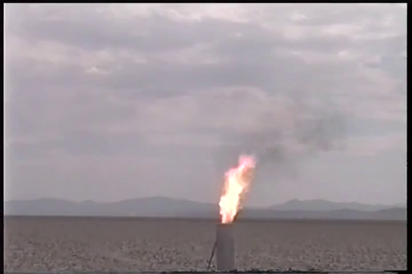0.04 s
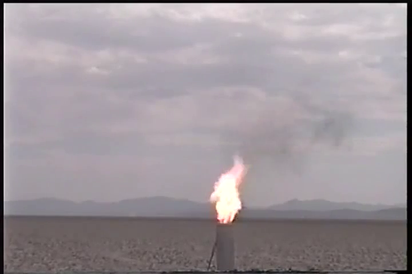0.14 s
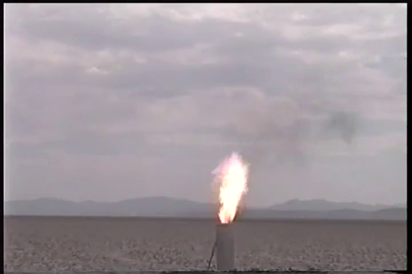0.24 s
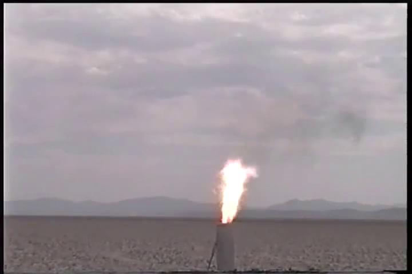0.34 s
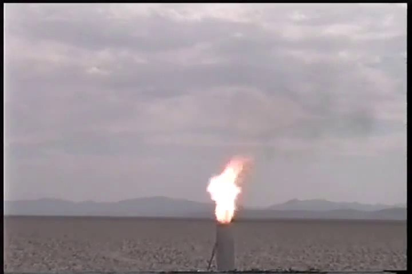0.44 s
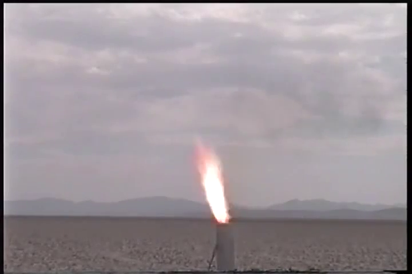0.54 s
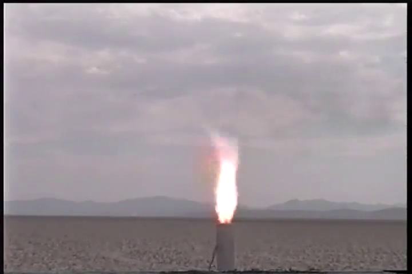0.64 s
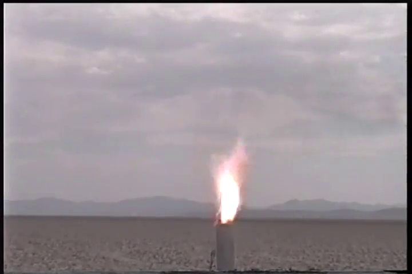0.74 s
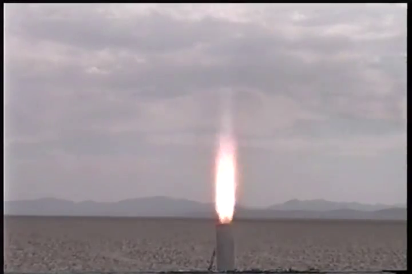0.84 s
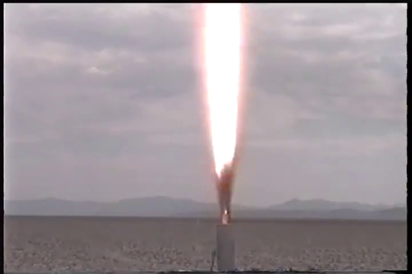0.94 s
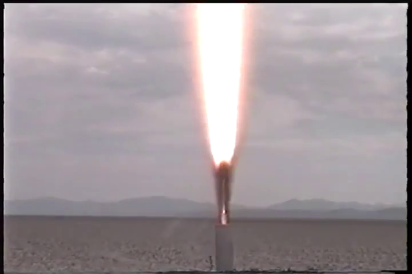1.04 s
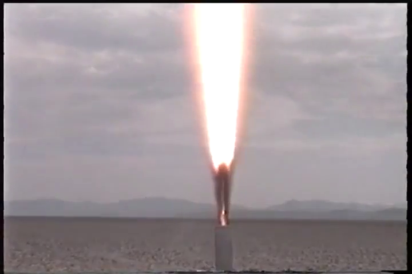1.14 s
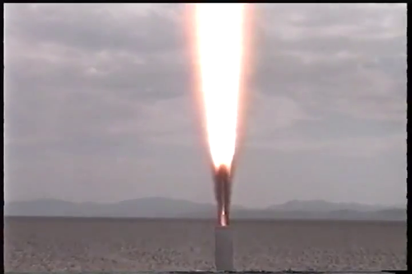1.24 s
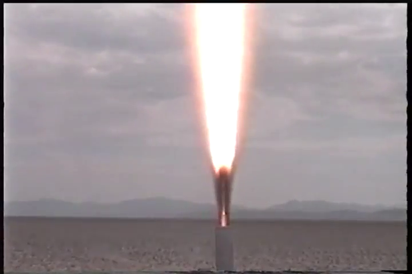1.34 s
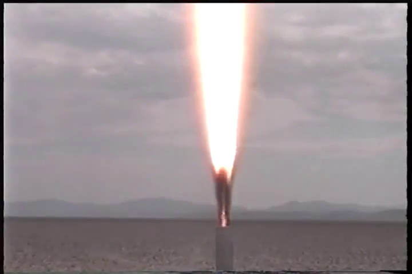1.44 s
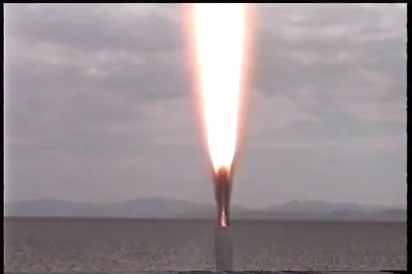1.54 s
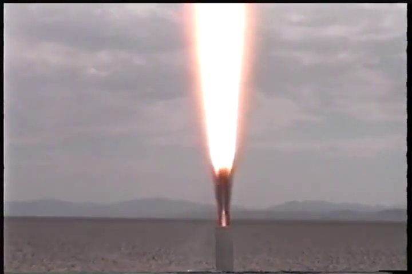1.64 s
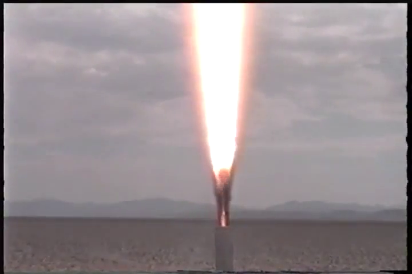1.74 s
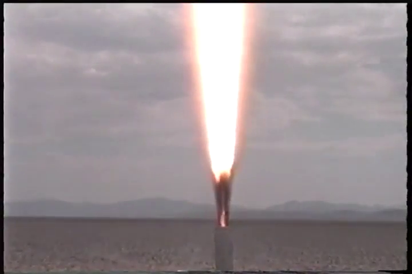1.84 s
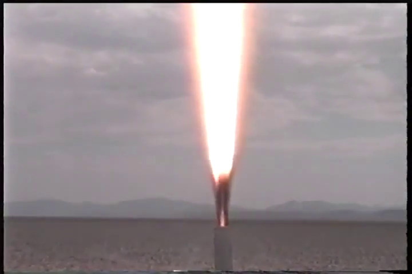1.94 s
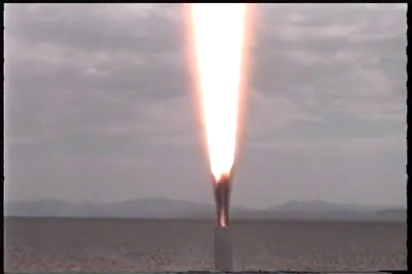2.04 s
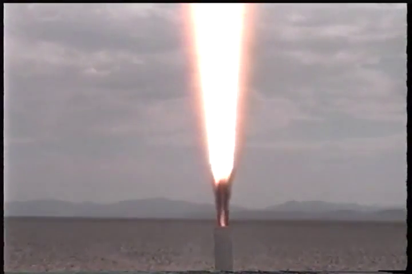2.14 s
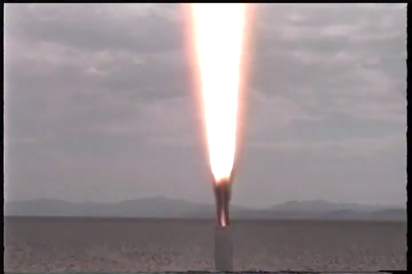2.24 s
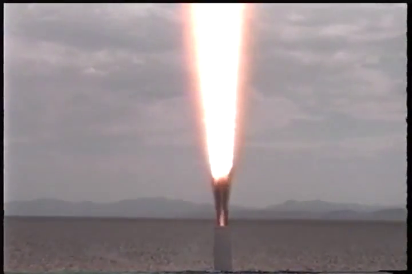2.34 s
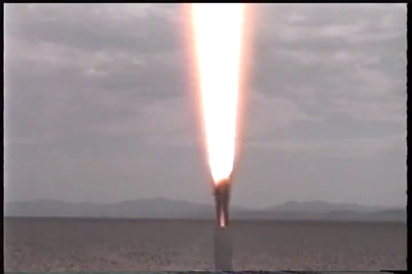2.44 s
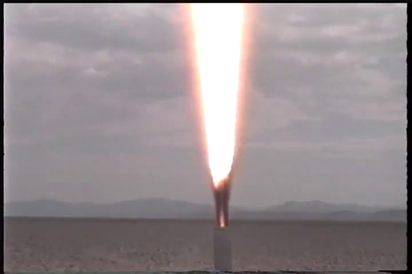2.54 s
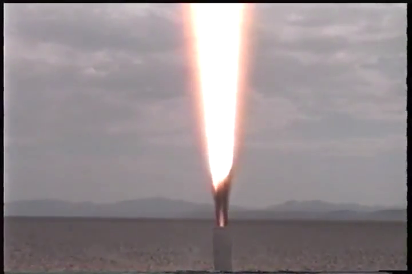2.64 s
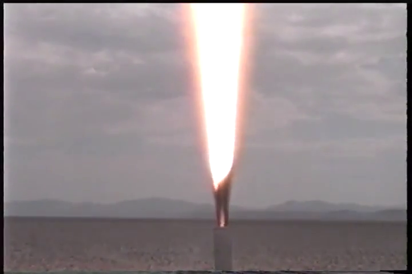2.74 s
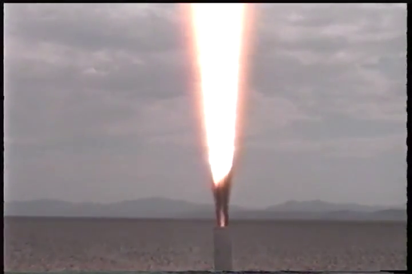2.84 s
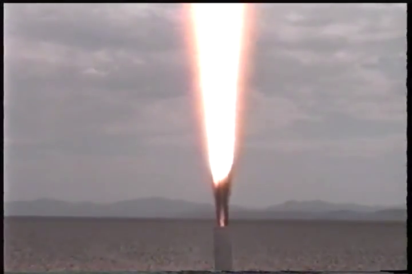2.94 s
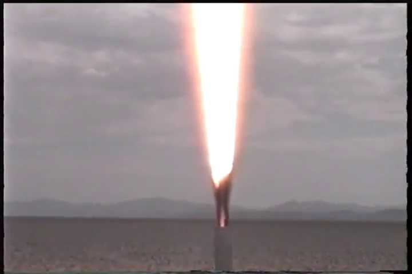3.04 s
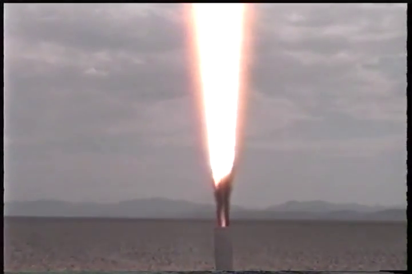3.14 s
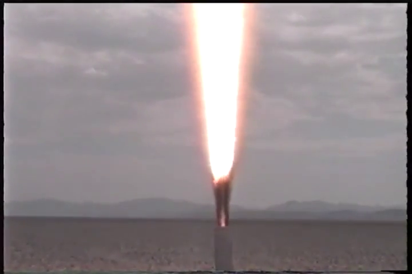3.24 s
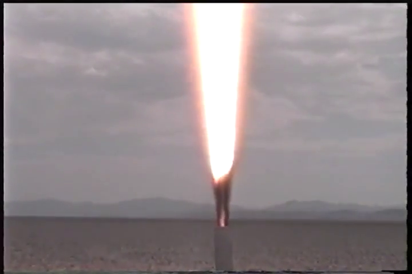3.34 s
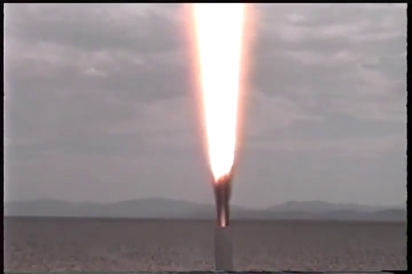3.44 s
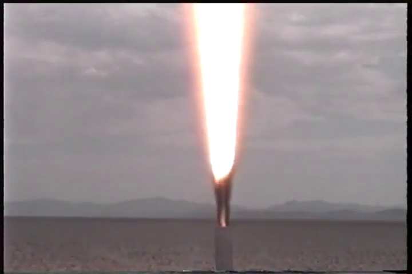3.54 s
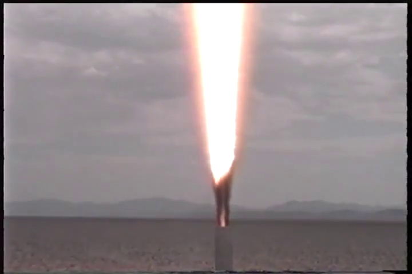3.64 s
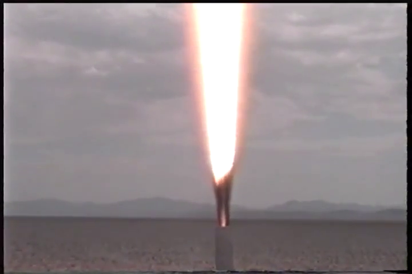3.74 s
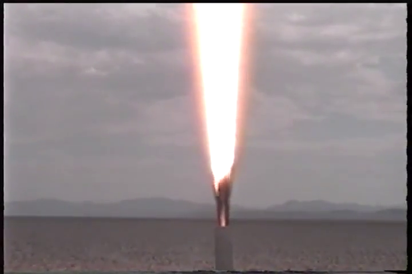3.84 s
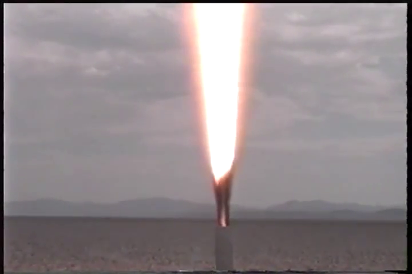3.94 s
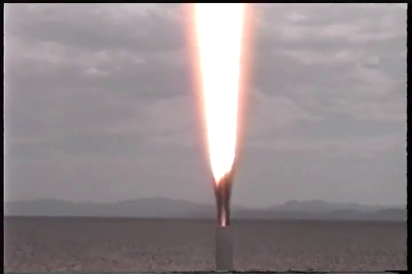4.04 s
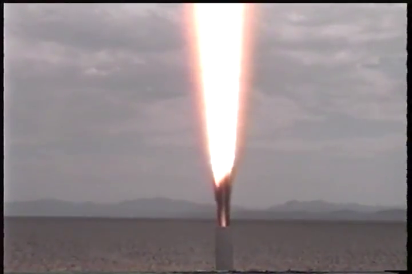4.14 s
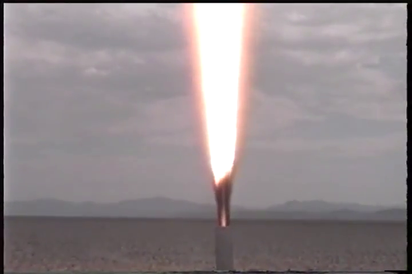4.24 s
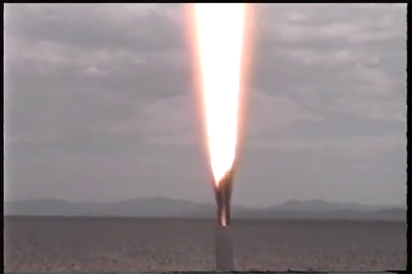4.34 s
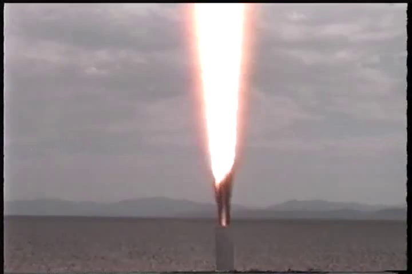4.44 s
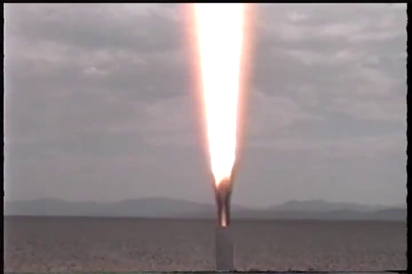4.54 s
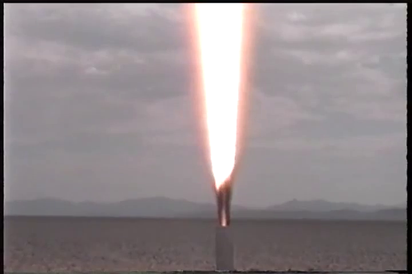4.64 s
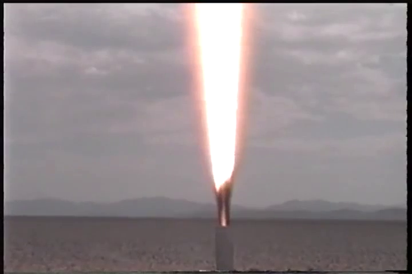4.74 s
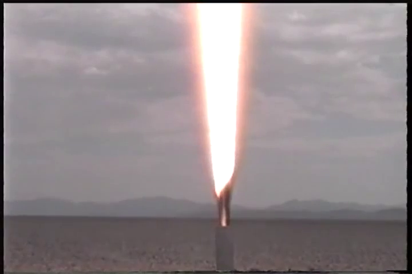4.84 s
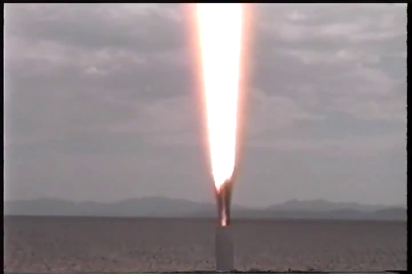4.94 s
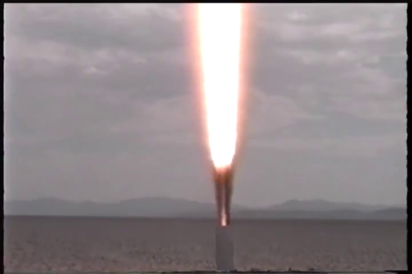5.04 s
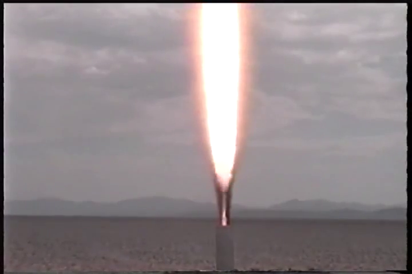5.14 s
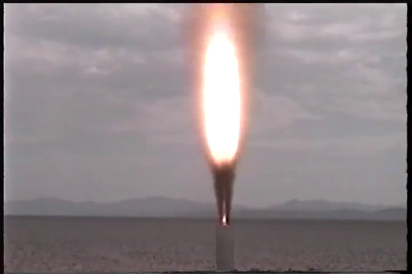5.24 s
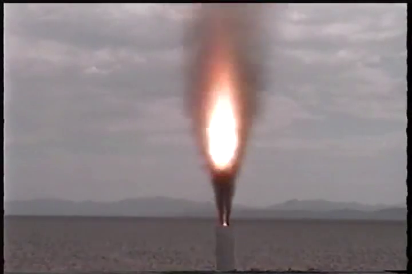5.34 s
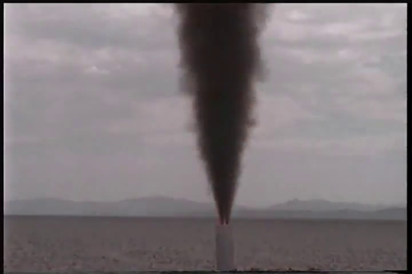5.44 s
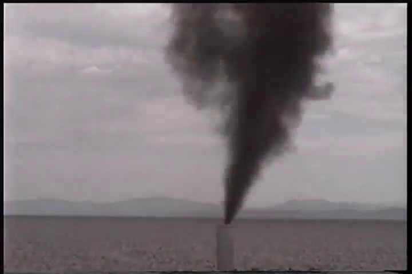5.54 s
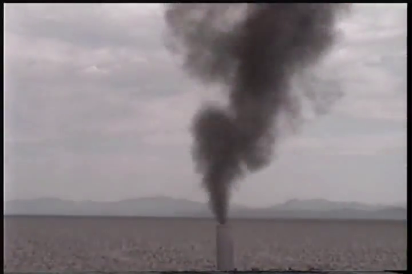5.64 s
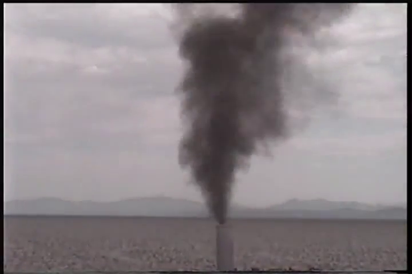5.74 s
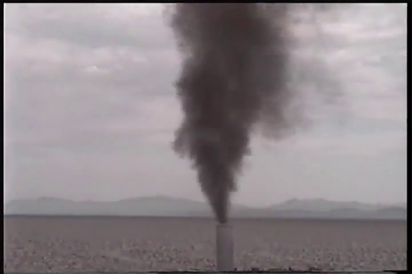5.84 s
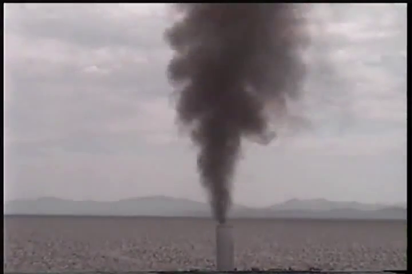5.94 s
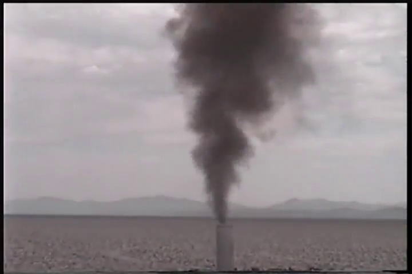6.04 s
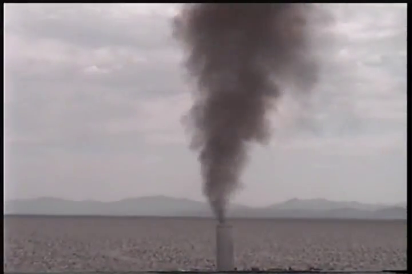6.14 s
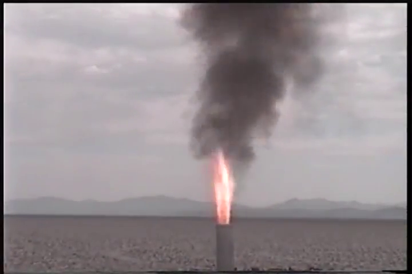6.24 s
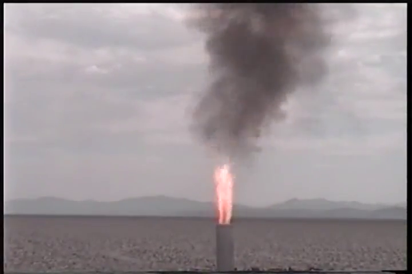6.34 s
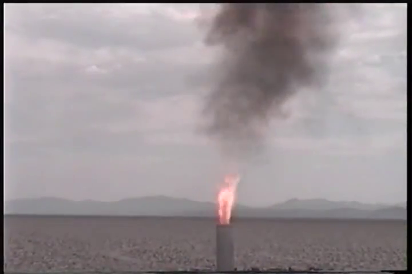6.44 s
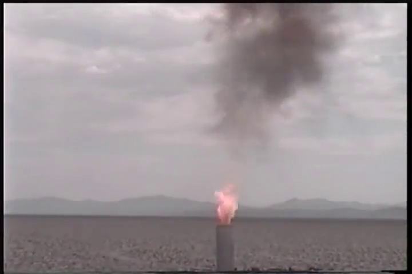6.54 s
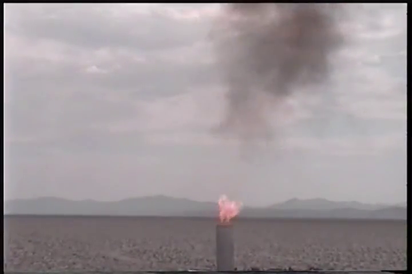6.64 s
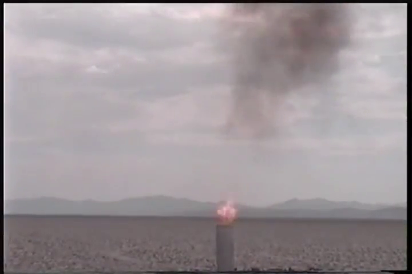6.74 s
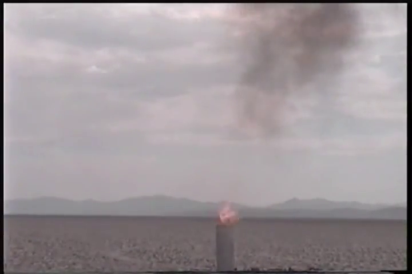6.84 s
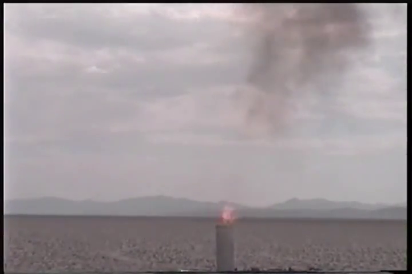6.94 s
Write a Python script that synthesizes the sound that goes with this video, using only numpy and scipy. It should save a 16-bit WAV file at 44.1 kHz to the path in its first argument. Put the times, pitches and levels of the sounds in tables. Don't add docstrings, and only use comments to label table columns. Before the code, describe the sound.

Rocket motor on open desert: coughing flame and pops, four seconds of harsh overloaded jet roar, smoky hiss, a faint relight, then near silence with ticks.

```python
import sys
import numpy as np
from scipy import signal
from scipy.fft import rfft, irfft, next_fast_len
from scipy.io import wavfile
from scipy.ndimage import uniform_filter1d, map_coordinates

SR = 44100
rng = np.random.default_rng(int(sys.argv[2]) if len(sys.argv) > 2 else 0)


def store_pcm(level_fs):
    pcm = np.round(np.clip(level_fs, -1, 1) * 32767).astype(np.int16)
    wavfile.write(sys.argv[1], SR, np.atleast_2d(pcm).T)


def undo_db(level):
    steps = np.asarray(level, float) / 20
    return 10 ** steps


N = 308023

# (f/Hz, level/dB per Hz)
AIR_SPECTRUM = [(15, -26), (25, -6), (60, -9), (230, -1.5), (600, -8.5), (1100, -7.5), (2400, -17.5),
                (3200, -9.5), (3750, -20), (4200, -14), (4750, -6), (5400, -19), (7000, -28), (15400, -32)]
# (f/Hz, level/dB)
TAPE_WHINE = [(1680, -88), (2159, -89), (2929, -88.5), (3171, -93.5), (4296, -89), (4727, -99.5)]
# (t/s, peak level/dB)
CASING_TICKS = [
    (6.745, -62),
    (6.875, -67),
]
# (t/s, peak level/dB, width/ms)
GAS_POPS = [(.2, -23, 1.5), (.283, -27, 1.5), (0.424, -16, 1.5), (.495, -13, 1.5), (.697, -12, 1.5),
            (.838, -9.5, 1.3), (5.499, -15, 1.1), (.385, -19, 1.8), (.54, -16, 2), (.59, -15, 1.8),
            (6.295, -23.5, .9), (6.311, -37, 1.2), (6.316, -36, 1.2)]
# (t/s, swell/dB)
COUGHS = [(0.019, 3), (0.119, 0), (0.188, 3), (0.22, 5), (0.251, 6.5), (0.3, -3.5), (0.322, 4),
          (0.397, 1.5), (0.423, 3), (0.449, 0.5), (0.509, 2.5), (0.539, -1), (0.565, 4), (0.689, 0.5),
          (0.839, 4.5)]
# (t/s, jet power level/dB, jet speed/0-1, loose flame/0-1)
THRUST = [(0, -46.5, 0.1, 1), (.05, -36.5, 0, 0.99), (.3, -32, 0.2, 1), (.47, -28.5, 0.53, 1.1),
          (.7, -21.5, 0.6, 0.97), (.86, -20.5, 0.58, .82), (.945, -17.5, 0.8, 0.51), (1, -16, 0.96, 0.08),
          (2, -18, 1, 0), (5.2, -18.5, 0.99, 0), (5.3, -17.5, 0.86, 0.18), (5.495, -18, 0.66, 0.36),
          (5.515, -19.5, 1.08, -.08), (5.655, -18, 1.15, -.25), (5.745, -30.5, 0.8, -.4),
          (5.93, -36, 0.52, 0.17), (6.05, -43.5, 0.52, 0.45), (6.2, -63, 0.77, 0.9)]
# (level/dB, time to fall 60 dB/s)
AFTERBURN_LAYERS = [
    (-48, 1.05),
    (-49, 0.92),
    (-48.5, 0.55),
    (-55.5, 0.38),
]
# (t/s, half length/s, f/Hz, level/dB)
CHAMBER_WHISTLES = [
    (1.156, .07, 1276, -24.5),
    (2.5, 0.12, 1176, -29.5),
]
# (f/Hz, level/dB per Hz)
RUMBLE_SPECTRUM = [(15, -39.5), (25, -18), (70, -16), (140, -8.5), (245, -0.5), (330, -2), (420, -12),
                   (600, -17.5), (1000, -50)]
ROAR_SPECTRUM = [(200, -39), (400, -2.5), (540, -3), (720, -2), (960, -2), (1230, 1), (1900, -3),
                 (2400, -9), (3500, -50)]
HISS_SPECTRUM = [(1200, -24.5), (1900, -9.5), (2500, -2), (2900, -1), (3450, -1), (4000, -12.5),
                 (4600, -21.5), (5800, -41)]
FIZZ_SPECTRUM = [(2800, -33.5), (3800, -3), (4400, -4), (5500, -0.5), (6400, -1), (7200, -10.5),
                 (8000, -22.5), (9000, -36), (12000, -58.5)]
SIZZLE_SPECTRUM = [(5500, -30.5), (7000, 3), (8200, -1.5), (9600, -12.5), (11500, -4.5), (13000, -14),
                   (15400, -26.5), (17000, -46)]
# (f/Hz, width/Hz, depth/0-1)
HOUSING_DIPS = [(1360, 190, 0.32), (3610, 300, 0.22), (4586, 250, 0.6), (4940, 340, 0.55)]
# (t/s, length/s)
SHORT_WINDOWS = [
    (0, .045),
    (.22, .1),
    (.41, .02),
    (.515, .06),
    (.65, .055),
    (.775, .015),
    (.835, .04),
    (5.71, .03),
]

AIR_DB = -63
RUMBLE_DB, RUMBLE_FLAME_DB = -18, 21
ROAR_DB, ROAR_FLAME_DB, ROAR_SPEED_DB = -9, 11.5, 5
FIZZ_DB, FIZZ_SPEED_DB = -11, 12.5
FLUTTER_DB, FLUTTER_FLAME_DB = 0.38, 1.9
SMOKE_FLAME = -0.18
DIES_DB_PER_S = 82
RELIGHT_S, RELIGHT_RISE_S = 6.296, 0.0037
SHOCK_ON_S, SHOCK_RISE_S, SHOCK_SAG_S, SHOCK_OFF_S, SHOCK_FALL_S = 0.97, 0.025, 5.5, 5.64, 0.09
YOUNG_STEEP, LATE_STEEP, SMOKE_STEEP = 0.33, 0.68, 0.14
TOP_HZ = 15350


def unit(x):
    return x / np.sqrt(np.mean(x ** 2) + 1e-20)


def curves(rows):
    s, *cols = np.transpose(rows)
    return [np.interp(np.arange(N) / SR, s, c) for c in cols]


def wobble(rate):
    return map_coordinates(rng.standard_normal(N // 100), [np.arange(N) * rate / SR])


def filtered(x, response):
    m = next_fast_len(N + SR // 4)
    return irfft(rfft(x, m) * response(np.fft.rfftfreq(m, 1 / SR)), m)[:N]


def resonance(f, ring_hz, width_hz):
    return 1j * f * width_hz / (ring_hz ** 2 - f * f + 1j * f * width_hz)


def rush(spectrum, patchy_db):
    z = signal.stft(rng.standard_normal(N), nperseg=256)[2]
    patches = uniform_filter1d(rng.standard_normal(z.shape), size=5, axis=0)
    patches = uniform_filter1d(patches, size=12, axis=1)
    x = signal.istft(z * undo_db(patchy_db * unit(patches)), nperseg=256)[1][:N]
    f, db = np.transpose(spectrum)
    return unit(filtered(x, lambda hz: undo_db(np.interp(np.log(hz + 1), np.log(f), db))))


def background():
    t = np.arange(N) / SR
    x = undo_db(AIR_DB - 7.0) * rush(AIR_SPECTRUM, patchy_db=2.0)
    for hz, db in TAPE_WHINE:
        level = undo_db(db + 4.5 + 1.5 * wobble(8))
        x += level * np.sin(2 * np.pi * hz * t + 0.69 * wobble(41))
    return x


def ticks():
    t = np.arange(N) / SR
    bursts = sum(undo_db(db) * np.exp(-((t - s) / 0.002) ** 2) for s, db in CASING_TICKS)
    return filtered(bursts * rng.standard_normal(N), lambda f: resonance(f, ring_hz=5700, width_hz=1500))


def pops():
    x, t = np.zeros(N), np.arange(N) / SR
    for s, db, ms in GAS_POPS:
        x += undo_db(db + 7.5) * np.exp(-((t - s - 0.003) / (0.0006 * ms)) ** 2)
    return filtered(x, lambda f: resonance(f, ring_hz=330, width_hz=260))


def coughs():
    t = np.arange(N) / SR
    swell_db = np.zeros(N)
    for s, db in COUGHS:
        swell = np.exp(-((t - s + 0.008) / 0.0063) ** 2)
        lull = np.exp(-((t - s - 0.007) / 0.006) ** 2)
        swell_db += db * (swell - 0.68 * lull)
    return swell_db


def steepening():
    return curves([(0, YOUNG_STEEP), (SHOCK_ON_S, YOUNG_STEEP),
                   (SHOCK_ON_S + SHOCK_RISE_S, 1), (SHOCK_SAG_S, 1),
                   (SHOCK_OFF_S, LATE_STEEP), (SHOCK_OFF_S + SHOCK_FALL_S, SMOKE_STEEP)])[0]


def afterburn():
    since = np.clip(np.arange(N) / SR - RELIGHT_S, 0, None)
    rise = 1 - np.exp(-since / RELIGHT_RISE_S)
    return [undo_db(db - 60 * since / t60) * rise for db, t60 in AFTERBURN_LAYERS]


def jet():
    t = np.arange(N) / SR
    power_db, speed, flame = curves(THRUST)
    power_db = power_db - DIES_DB_PER_S * np.clip(t - THRUST[-1][0], 0, None)
    roar_flame = np.maximum(flame, SMOKE_FLAME)

    late_rumble, late_roar, late_hiss, late_fizz = afterburn()
    rumble = undo_db(power_db + RUMBLE_DB + RUMBLE_FLAME_DB * flame) + late_rumble
    roar = undo_db(power_db + ROAR_DB + ROAR_FLAME_DB * roar_flame + ROAR_SPEED_DB * speed) + late_roar
    hiss = undo_db(power_db) + late_hiss
    fizz = undo_db(power_db + FIZZ_DB + FIZZ_SPEED_DB * speed) + late_fizz

    flutter_db = FLUTTER_DB + FLUTTER_FLAME_DB * np.abs(flame)
    flutter = flutter_db * (0.72 * wobble(45) + 0.1 * wobble(16)) + coughs()
    x = rumble * undo_db(0.48 * flutter) * rush(RUMBLE_SPECTRUM, patchy_db=1.0)
    x += roar * undo_db(0.8 * flutter) * rush(ROAR_SPECTRUM, patchy_db=1.22)
    x += hiss * undo_db(flutter) * rush(HISS_SPECTRUM, patchy_db=0.34)
    x += fizz * undo_db(0.97 * flutter) * rush(FIZZ_SPECTRUM, patchy_db=0.56)
    sizzle = fizz * undo_db(-23.0 + 15.97 * steepening() + 0.77 * flutter)
    x += sizzle * rush(SIZZLE_SPECTRUM, patchy_db=0.6)

    for s, half, hz, db in CHAMBER_WHISTLES:
        whistle = np.sin(2 * np.pi * hz * t + 0.27 * wobble(25))
        x += undo_db(db + 2) * np.exp(-((t - s) / half) ** 2) * whistle
    return x


def scene():
    return (background() + ticks() + pops() + jet())[None]


def coarse_treble(x, step_db, follow, size):
    window = np.sqrt(np.hanning(size))
    hz, _, z = signal.stft(x, SR, window, nperseg=size)
    power = np.abs(z) ** 2 + 1e-20
    near = np.abs(uniform_filter1d(power, size=8 + size // 85, axis=0))
    frame = power.mean(axis=0)
    fine_db = np.interp(hz, [5500, 8800], [-16, 0])[:, None]
    step = undo_db(step_db + fine_db) * np.sqrt(near ** (1 - follow) * frame ** follow)
    height = np.sqrt(power)
    kept = z / height * step * np.round(height / step) * (hz < TOP_HZ)[:, None]
    return signal.istft(kept, SR, window, nperseg=size)[1][:N]


def camera_track(x):
    t = np.arange(N) / SR
    short = sum((t >= s) * (t < s + length) * 1.0 for s, length in SHORT_WINDOWS)
    short = uniform_filter1d(short, size=128)
    long_part = coarse_treble(x, step_db=0.8, follow=0.33, size=2048)
    short_part = coarse_treble(x, step_db=0.2, follow=0.33, size=256)
    return (1 - short) * long_part + short * short_part


def roll_off(x):
    return signal.sosfilt(signal.butter(12, 15590, fs=SR, output="sos"), x)


def record(dry):
    def dips(f):
        return np.prod([1 - depth * resonance(f, hz, width) for hz, width, depth in HOUSING_DIPS], axis=0)

    def lift(f):
        return (1 + 1j * f / 1200) / (1 + 1j * f / 4000)

    x = filtered(dry[0], lambda f: dips(f) * lift(f))
    top = undo_db(-3.5) * np.where(x > 0, undo_db(-0.15), undo_db(-0.44))
    x = x / (1 + np.abs(x / top) ** 4) ** (1 / 4)
    bass_hz = 35
    x = filtered(x, lambda f: 1j * f / (bass_hz + 1j * f) / lift(f))
    mix = camera_track(x)[None]
    return roll_off(mix)


dry = scene()
out = record(dry)
store_pcm(out)
```